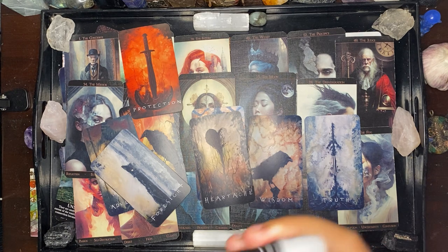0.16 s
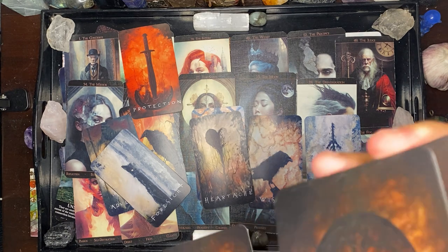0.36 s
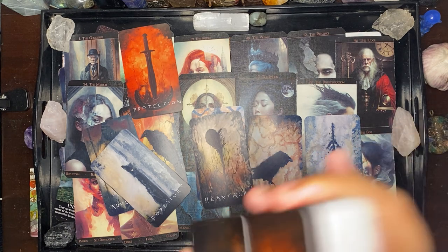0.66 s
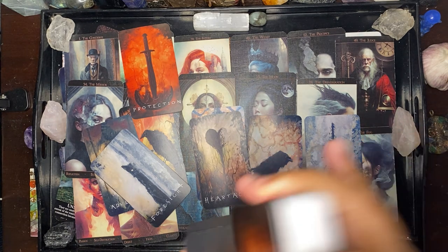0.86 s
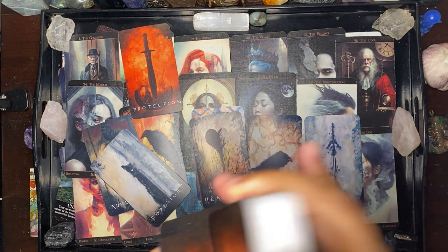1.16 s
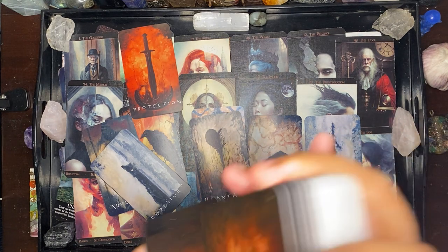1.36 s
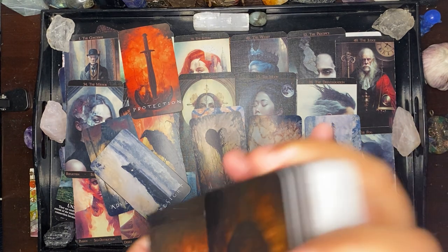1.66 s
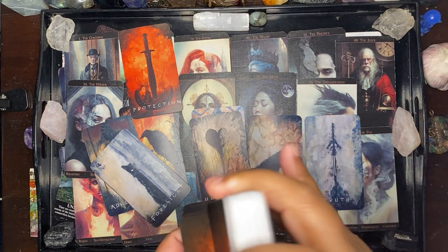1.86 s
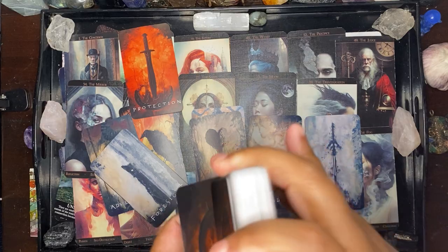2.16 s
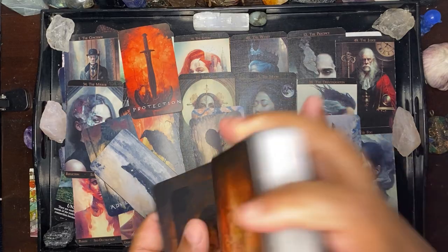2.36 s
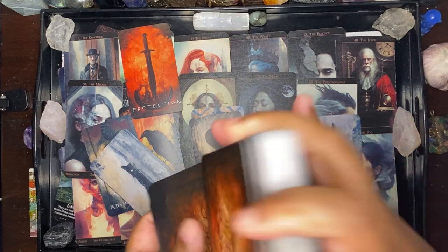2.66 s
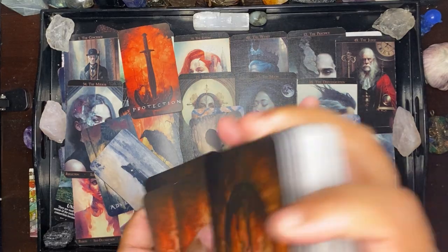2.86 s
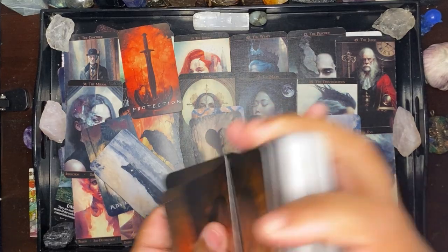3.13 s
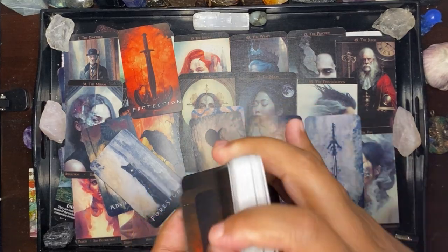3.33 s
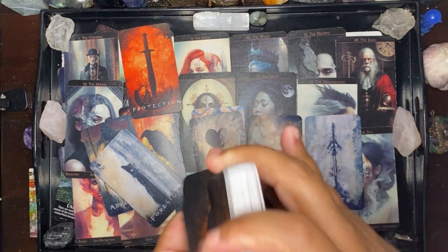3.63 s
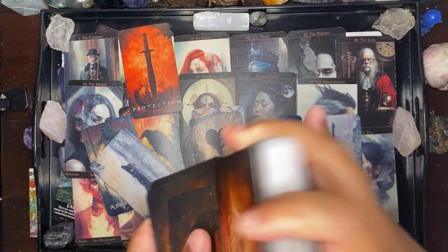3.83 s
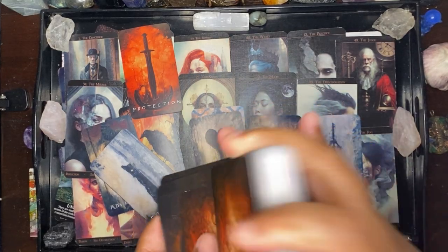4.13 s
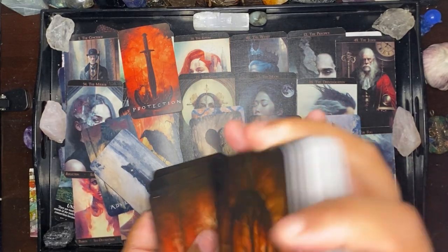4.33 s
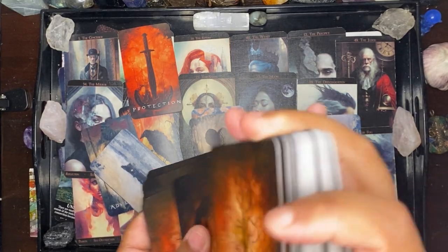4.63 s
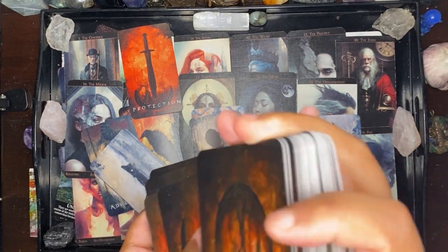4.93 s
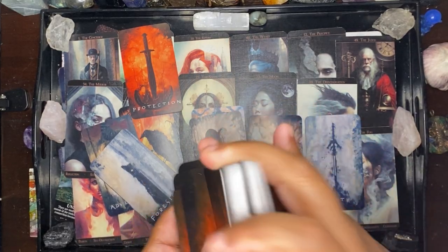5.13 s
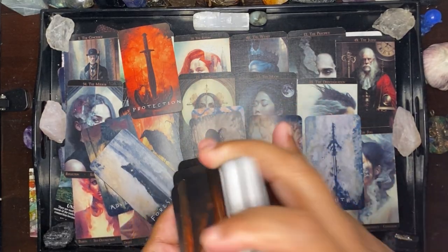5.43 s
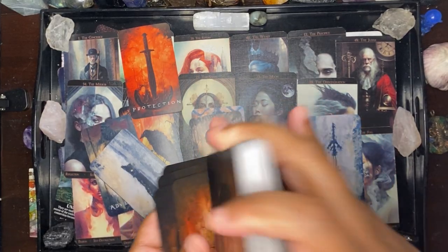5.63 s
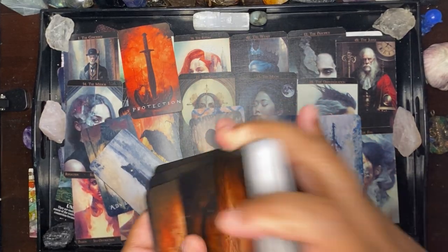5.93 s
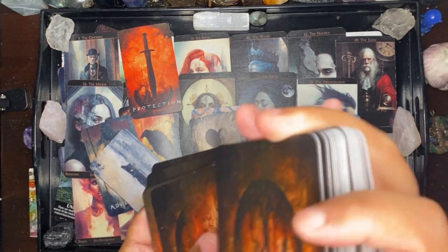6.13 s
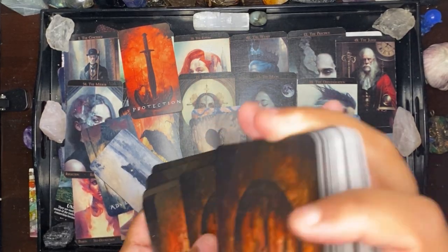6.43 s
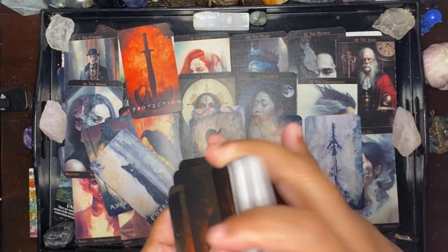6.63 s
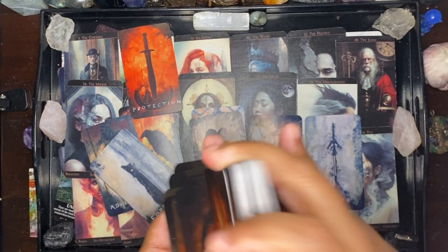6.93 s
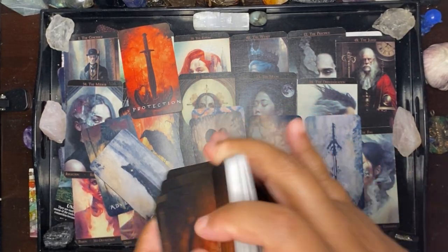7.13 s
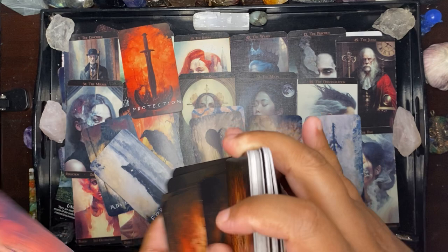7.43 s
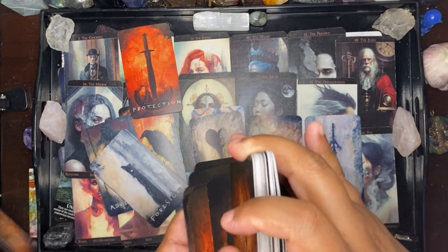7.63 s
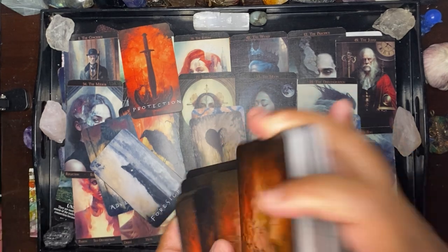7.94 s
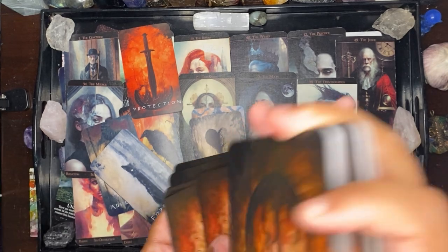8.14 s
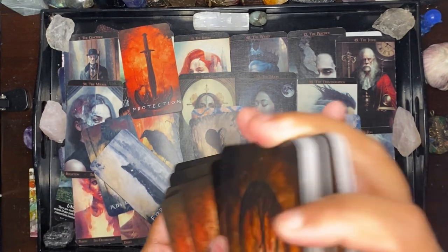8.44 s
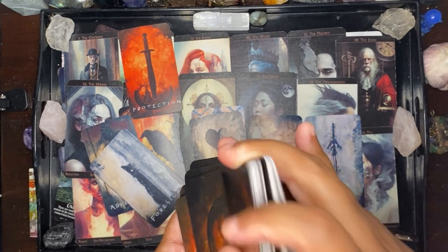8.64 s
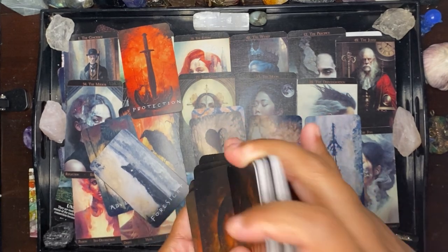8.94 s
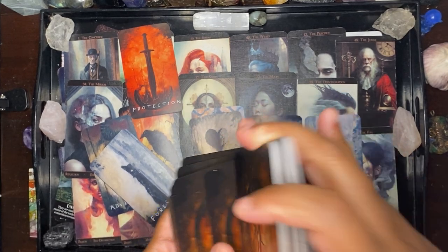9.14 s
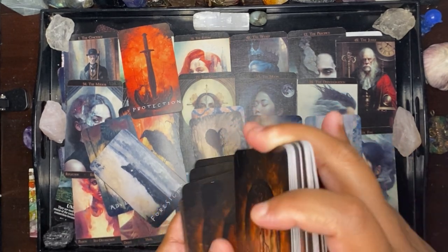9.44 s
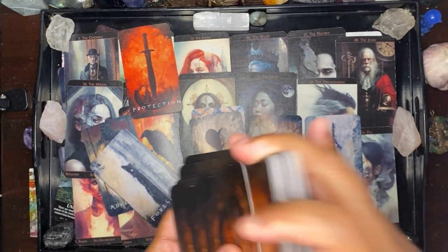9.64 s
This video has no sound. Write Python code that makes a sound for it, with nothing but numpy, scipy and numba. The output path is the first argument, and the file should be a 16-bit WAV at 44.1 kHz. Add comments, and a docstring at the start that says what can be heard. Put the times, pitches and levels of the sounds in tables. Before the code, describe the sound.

A deck of large cards is shuffled overhand close by, brisk papery hisses and soft slaps about three a second, over a faint low room hum.

```python
"""A small furnished room with a faint low hum; a phone listens from close by, above a table.
A deck of large cards is shuffled overhand, about three strokes a second. Each packet hisses off the deck
(shaped noise), touches the pile with an edge and slaps home with a soft thump in the palm (struck resonances).
Between strokes cards rustle, click and pop; the room answers with short, changing noise echoes."""
import sys
import numpy as np
from scipy import signal
from scipy.fft import rfft, irfft
from scipy.io import wavfile
from scipy.ndimage import uniform_filter1d
from numba import njit

SR = 44100
rng = np.random.default_rng(int(sys.argv[2]) if len(sys.argv) > 2 else 0)


def digitize_waveform(pressure):
    """Quantize a signal to 16-bit integers and store it at the path in sys.argv[1].

    Rows of a 2-D input are taken as channels; values are limited to [-1, 1].
    """
    field = np.atleast_2d(pressure).T
    bounded = np.clip(field, -1, 1)
    quanta = np.round(bounded * 32767).astype(np.int16)
    wavfile.write(sys.argv[1], SR, quanta)


N = 431738
TIME = np.arange(N) / SR
HIT_SIZE, LEAD_SIZE = 4096, 256  # samples in one blow, and samples kept free ahead of its push


def undb(db):
    """Decibels to gain."""
    return 10 ** (np.asarray(db) / 20)


def unit(x):
    """Scale to rms 1."""
    return x / np.sqrt(np.mean(x ** 2))


def freqs(size):
    """Frequencies of a real spectrum in Hz, kept above zero."""
    return np.maximum(np.fft.rfftfreq(size, 1 / SR), 1)


def gains(points, size):
    """Gain per frequency from (Hz, dB) points, joined on a logarithmic pitch scale."""
    hz, db = np.transpose(points)
    return undb(np.interp(np.log(freqs(size)), np.log(hz), db))


def colour(x, points):
    """Filter by (Hz, dB) points, to rms 1."""
    size = x.shape[-1]
    return unit(irfft(rfft(x) * gains(points, size), size))


def walk(rate):
    """Smooth random drift with rms near 1, drawing a new value `rate` times a second."""
    hold = max(int(SR / rate), 1)
    steps = np.repeat(rng.standard_normal(N // hold + 1), hold)
    return unit(uniform_filter1d(steps, hold)[:N])


def add(out, start_s, x):
    """Mix x into out from a start time."""
    i = max(int(start_s * SR), 0)
    out[i:i + len(x)] += x[:max(N - i, 0)]


# Lead of the left microphone port over the right: pitch_hz, phase_radians
PORT_PHASE = [(0, 0), (950, -.35), (2400, .6), (4400, .9), (5200, .3), (6400, 2.2), (7350, 3.14),
              (10900, 6.5), (13500, 9.42), (16000, 11.9)]
# Left port level minus right: pitch_hz, level_db
PORT_BALANCE = [(100, -.2), (350, -.8), (600, -2.5), (1100, -1), (2400, -1.6), (3600, 1), (4500, -1.8),
                (6000, 0)]


def ports(x):
    """Two microphone ports hear the near sound with a lag and a slight imbalance."""
    hz, radians = np.transpose(PORT_PHASE)
    half_phase = np.exp(.5j * np.interp(freqs(N), hz, radians))
    lean = np.sqrt(gains(PORT_BALANCE, N)) * half_phase
    return irfft(rfft(x) * np.array([lean, 1 / lean]), N)


# Spectrum of the room's low rumble, scaled to rms 1 on use: pitch_hz, level_db
AIR = [(20, -31), (35, -17.5), (48, 3.5), (65, 4), (90, -5), (125, 4), (160, -7), (320, -7), (500, -14.5),
       (1000, -19), (2500, -35.5), (6000, -47), (16000, -59)]
# Hum lines, level as rms about which each one wavers: pitch_hz, level_db
HUM = [(119.3, -57), (188, -68), (236, -74), (287, -74.5), (326, -69.5)]


def background(air_db=-56, port_hiss_db=-84):
    """Low rumble of the room with a wavering hum, nearly alike at both ports."""
    air = undb(air_db) * colour(rng.standard_normal(N), AIR) * undb(0.76 * walk(5.4))
    hum = np.zeros(N)
    for hz, db in HUM:
        line = unit(np.sin(2 * np.pi * hz * TIME + 0.39 * walk(8.7)))
        hum += undb(db + 1.8 * walk(8)) * line
    return ports(air + hum) + undb(port_hiss_db) * rng.standard_normal((2, N))


def friction(grain_db, patchy_db):
    """Card faces rubbing: dense tiny slips, as noise whose level wavers finely and in uneven patches."""
    return rng.standard_normal(N) * undb(grain_db * walk(1500) + patchy_db * walk(110))


def ticks(rate, spread_db, ring_s):
    """Single card edges slipping past each other: sparse crisp grains of uneven size."""
    starts = rng.random(N) < rate / SR
    sizes = starts * undb(spread_db * np.minimum(rng.exponential(1, N), 3))
    envelope = signal.lfilter([1], [1, -np.exp(-1 / (ring_s * SR))], sizes)
    return envelope * rng.standard_normal(N)


# How the cards creep before a landing: the creep mostly starts earlier in later strokes, and its rub
# rises and falls: time_s, creep_lead_s (creep starts this long before a landing), extra_rub_db
GRIP = [(.3, 0.089, 2.5), (1, 0.11, -2), (2.3, 0.11, 3.5), (3.2, 0.16, -3), (4.9, 0.14, -3),
        (6.4, 0.16, 0.5), (7.3, 0.17, 4), (8.2, .15, 0.5), (9.7, 0.19, -0.5)]


def creep(rest_db, grip_db, lift_db, attack_s=0.014, lift_s=0.05, release_s=.15):
    """Gain of the creeping cards: it starts with the grip, grows as the packet is lifted, then dies away."""
    db = np.full(N, float(rest_db))
    time_s, creep_lead_s, _ = np.transpose(GRIP)
    for landing, *_ in STROKES:
        grip = landing - np.interp(landing, time_s, creep_lead_s)
        lift = landing - lift_s
        moments = [grip - attack_s, grip, lift, lift + release_s]
        db = np.maximum(db, np.interp(TIME, moments, [rest_db, grip_db, lift_db, rest_db]))
    return undb(db)


# Spectrum of the bright hiss of card faces, scaled to rms 1 on use: pitch_hz, level_db
HISS = [(800, -26), (3000, -27), (4300, -8), (5400, -1.5), (6400, 0.5), (7600, 3.5), (9400, 3.5),
        (11200, -4), (13000, 1.5), (15500, -3)]
# Spectrum of the duller rub of the cards, scaled to rms 1 on use: pitch_hz, level_db
RUB = [(150, 3), (500, -4.5), (900, -6.5), (1300, -2.5), (2300, -0.5), (3000, -1.5), (3900, -9.5),
       (5500, -7.5), (9000, -58.5)]
# Longer rubs as the deck is shifted in the hand, swelling and fading alike: peak_s, fade_s, level_db
RUBS = [(0.063, 0.015, -46), (.2, 0.033, -59), (2.4, 0.022, -55), (6.845, 0.011, -46), (7.18, 0.018, -56),
        (7.61, 0.012, -50), (7.67, 0.022, -50), (7.785, 0.023, -44.5), (8.08, .035, -66),
        (9.21, 0.039, -55), (9.625, 0.014, -54)]


def rustle(tick_db=-7):
    """Cards creep and tick against each other around each stroke and whenever the deck is shifted."""
    time_s, _, extra_rub_db = np.transpose(GRIP)
    shifts = sum(undb(db) * np.exp(-np.abs(TIME - peak) / fade_s) for peak, fade_s, db in RUBS)
    grains = undb(tick_db) * unit(ticks(rate=70, spread_db=5, ring_s=.0012))
    rub = colour(unit(friction(grain_db=2.0, patchy_db=4.0)) + grains, RUB)
    hiss = colour(unit(friction(grain_db=3.5, patchy_db=4.5)) + grains, HISS)
    extra_rub = undb(np.interp(TIME, time_s, extra_rub_db))
    rub_gain = creep(rest_db=-69.5, grip_db=-58.5, lift_db=-54.0) * extra_rub + shifts
    hiss_gain = creep(rest_db=-69, grip_db=-58, lift_db=-47) + undb(-12) * shifts
    return rub_gain * rub + hiss_gain * hiss


@njit
def sweep(x, hz, width):
    """Band-pass with a moving centre; width is a share of the centre."""
    y, band, low = np.empty(len(x)), 0., 0.
    for i in range(len(x)):
        g = np.tan(np.pi * hz[i] / SR)
        v = (band + g * (x[i] - low)) / (1 + g * (g + width))
        band, low, y[i] = 2 * v - band, low + 2 * g * v, width * v
    return y


# One row per stroke, levels before each sound's own trims: landing_s, slide_lead_s and edge_lead_s (slide
# start and edge touch, this long before landing), hiss_db, edge_db, spread_s (time over which cards arrive),
# thump_db (palm), clap_db, hardness_db_per_octave, crack_db (faces)
STROKES = [(0.2931, 0.046, 0.021, -35, -35.5, 0.0022, -34, -35.5, -1.5, -50),
           (.6832, 0.015, 0.0043, -40, -52, 0.0041, -39, -35, -1.8, -33),
           (1.0331, 0.025, 0.0069, -33, -29.5, 0.0031, -37, -28.5, 2.5, -24.5),
           (1.376, 0.037, .012, -32, -38.5, 0.0011, -44, -40, 0, -30),
           (1.6694, .027, 0.0098, -33, -38, 0.00069, -41, -35.5, 2, -32),
           (1.983, 0.029, 0.0094, -35.5, -38.5, .0018, -40, -33, 2.2, -29.5),
           (2.2643, 0.039, 0.0056, -32, -40, .0021, -38, -33, 1.7, -32),
           (2.5925, 0.046, 0.0093, -30.5, -39, 0.00093, -32, -29, 3, -28),
           (2.8745, 0.034, .009, -31.5, -38, 0.00076, -37, -31.5, 1, -23.5),
           (3.1958, 0.051, .01, -35, -34.5, 0.00041, -30, -27.5, 2, -24),
           (3.4562, 0.038, .009, -29, -39.5, 0.0019, -34.5, -29.5, 2.5, -25),
           (3.7724, .045, 0.0092, -29, -41.5, 0.0019, -37.5, -33, 2, -31),
           (4.0539, 0.037, .01, -28.5, -37, 0.0027, -36.5, -30.5, 1.2, -35),
           (4.3458, 0.039, .008, -33, -35.5, 0.00056, -31, -30, 2.3, -34.5),
           (4.6514, 0.057, 0.0081, -28, -42.5, 0.0017, -30.5, -32, -5, -63),
           (4.925, 0.048, 0.0093, -31, -38.5, 0.0012, -30.5, -34, 6.5, -24.5),
           (5.243, .061, 0.0097, -29, -37.5, 0.0013, -30.5, -29, -3.5, -56),
           (5.5204, 0.033, 0.0084, -29.5, -39, 0.0022, -30.5, -29.5, 1, -32.5),
           (5.8376, .042, 0.008, -29.5, -36.5, .0014, -28, -30.5, -2.5, -41),
           (6.13, 0.045, 0.0054, -29.5, -39.5, 0.00068, -27, -30, 1.5, -27),
           (6.429, .037, 0.0076, -28.5, -37.5, 0.00052, -26, -31.5, -1.5, -28),
           (6.7372, 0.051, 0.0091, -28.5, -35, 0.0019, -28, -34.5, -3.5, -52),
           (7.0166, 0.042, 0.0071, -28, -42.5, 0.0012, -26.5, -28.5, 1.7, -24),
           (7.313, 0.044, 0.0079, -43.5, -55, 0.0016, -31.5, -30, -1.8, -38.5),
           (7.8366, 0.039, .0105, -27.5, -36.5, 0.00084, -30.5, -35.5, -5, -36.5),
           (8.1416, 0.031, .0067, -31.5, -36.5, .0015, -27.5, -29, 1, -29),
           (8.4702, 0.057, .018, -28.5, -39.5, 0.0014, -35, -35, -3.5, -43),
           (8.764, 0.075, 0.025, -29.5, -53, 0.0017, -40, -40.5, -4, -48),
           (9.0458, 0.045, .008, -33, -39, 0.0019, -28.5, -29, -3.5, -36),
           (9.6943, 0.024, .003, -38.5, -45, .00065, -30.5, -34, -2.1, -29)]


def slides(fade_db=24, rise_s=.009, stop_s=0.0027, open_hz=5200, closed_hz=2400, free_s=0.024,
           slowing_db_per_s=380, scrape_db=-35, scrape_follow=0.28, usual_edge_db=-39):
    """A packet hisses off the deck; as it nears the pile its edge scrapes with a falling resonance."""
    out = np.zeros(N)
    hiss = colour(friction(grain_db=1.5, patchy_db=2.0), HISS)
    rub = colour(friction(grain_db=0.5, patchy_db=4.0), RUB)
    for landing, slide_s, lead_s, hiss_db, edge_db, *_ in STROKES:
        start, end = landing - slide_s, landing - lead_s
        i, j = int((start - rise_s) * SR), int((end + stop_s) * SR)
        t, length = TIME[i:j], end - start
        # the hiss swells early and fades as the packet slows; the scrape grows until the edge touches
        late_db = hiss_db - slowing_db_per_s * (length - free_s)
        moments = [t[0], start + 0.1 * length, start + 0.49 * length, start + 0.86 * length, end - .001, t[-1]]
        hiss_steps = [hiss_db - fade_db, hiss_db, hiss_db, late_db, late_db + 2, late_db - fade_db]
        hiss_curve = np.interp(t, moments, hiss_steps)
        scrape_curve = np.interp(t, moments, [-16.0, -22, -11, -1.5, 5.0, -3.5])
        # a harder edge knock follows a louder scrape
        scrape_curve += scrape_db + scrape_follow * (edge_db - usual_edge_db)
        falling_hz = np.geomspace(open_hz, closed_hz, j - i)
        edge = unit(sweep(rng.standard_normal(j - i), falling_hz, 0.37))
        scrape = undb(-2.0) * edge + undb(-4.5) * unit(rub[i:j])
        out[i:j] += undb(hiss_curve) * hiss[i:j] + undb(scrape_curve) * scrape
    return out


# Centres of the overlapping bands in which a blow's levels are set: pitch_hz
BANDS_HZ = [70, 300, 900, 2600, 9000]


def tilt(hardness_db, pivot_hz):
    """Level in each band of a contact: the harder it is, the more treble and the less bass."""
    return hardness_db * np.log2(np.array(BANDS_HZ) / pivot_hz)


# Resonances of the deck held in cupped hands, before each grip detunes them and the bands are levelled:
# pitch_hz, width_hz, level_db
DECK = [(72, 46, 11.5), (250, 150, 1.5), (399, 46, 4.5), (724, 55, 4.5), (940, 290, -0.5), (2430, 780, 4.5),
        (6360, 4300, -4)]


def contact(band_db, spread_s, scatter_db, scatter_hz, lag_cycles, grip=0.053, rattle_db=-16,
            ahead_s=0.00089, top_hz=7000):
    """One blow on the deck: a push among single cards clapping together, ringing the deck's resonances."""
    t, f = (np.arange(HIT_SIZE) - LEAD_SIZE) / SR, freqs(HIT_SIZE)
    # a few cards arrive just ahead of the packet, and stragglers rattle after it
    arrivals = np.exp(-np.abs(t) / np.where(t < 0, ahead_s, spread_s))
    uneven = rng.exponential(1, HIT_SIZE // 32).repeat(32)
    stragglers = undb(rattle_db) * (t > 0) * np.exp(-np.abs(t) / .007) * uneven
    claps = np.roll(rng.standard_normal(HIT_SIZE) * (arrivals + stragglers), -LEAD_SIZE)
    # at low frequencies the packet moves as one, so only the push is left
    scatter = undb(scatter_db) * f / (f + scatter_hz)
    scatter = scatter / np.sqrt(1 + (f / top_hz) ** 2)  # soft claps lack the push's top
    force = 1 + scatter * rfft(claps / np.linalg.norm(claps))
    hz, width, db = np.transpose(DECK)[:, :, None]
    hz = hz * np.exp(grip * rng.standard_normal(hz.shape))  # every grip tunes the deck a little differently
    body = 1 + np.sum(undb(db) / (1 + 1j * (f / hz - hz / f) * hz / width), axis=0)
    # the cards bend and squeeze out air: low tones come late, so the blow is a fast falling chirp
    chirp = np.exp(-2j * np.pi * lag_cycles * np.log(f)) / np.sqrt(1 + (48 / f) ** 8)
    delay = np.exp(-2j * np.pi * f * LEAD_SIZE / SR)
    spectrum = force * body * chirp * delay
    out = 0
    # a shorter list of levels leaves out the lowest bands
    for share, level_db in zip(np.eye(len(BANDS_HZ))[-len(band_db):], band_db):
        part = irfft(spectrum * np.interp(np.log(f), np.log(BANDS_HZ), share))
        out = out + undb(level_db) * part / np.linalg.norm(part)
    return out * np.sqrt(SR / 100)  # band levels are rms over 10 ms


def edges():
    """The packet's edge knocks on the pile just ahead of each slap, with a small puff of air."""
    out = np.zeros(N)
    trim_db = np.array([-6, -1.0, -3.5, -1.5, -18.5])  # per band
    for landing, _, lead_s, _, edge_db, *_ in STROKES:
        knock = contact(edge_db + trim_db, 0.0016, scatter_db=9.0, scatter_hz=1100, lag_cycles=1.2)
        add(out, landing - lead_s - LEAD_SIZE / SR, knock)
    return out


def slaps(settle_db=-13, settle_s=.009, lag_spread=0.17, hollow=0.22, thin=0.08):
    """Packets land flat on the pile and thump in the palm; a loose card settles just after each."""
    out = np.zeros(N)
    trim_db = np.array([0.1, -1.53, -1.5, -1.76, -0.014])  # per band
    chances = rng.uniform(-1, 1, (len(STROKES), 3))
    for stroke, (stiffness, late, hard) in zip(STROKES, chances):
        landing, *_, spread_s, thump_db, clap_db, hardness_db, crack_db = stroke
        low, middle, high = clap_db + tilt(hardness_db, pivot_hz=883)[1:4]
        # a packet cushioned by air cracks less and sounds hollow and thin
        cushion_db = clap_db - crack_db
        low, middle = low - thin * cushion_db, middle + hollow * cushion_db
        start = landing - LEAD_SIZE / SR
        band_db = np.array([thump_db, low, middle, high, crack_db]) + trim_db
        slap = contact(band_db, spread_s, scatter_db=7.5, scatter_hz=607,
                       lag_cycles=.95 * (1 + lag_spread * stiffness),
                       rattle_db=-19, ahead_s=0.00076, top_hz=10000)
        add(out, start, slap)
        loose_card = contact(band_db[1:] + settle_db + 3 * hard, 0.0026, scatter_db=6.5, scatter_hz=300,
                             lag_cycles=0.5054, top_hz=4000)
        add(out, start + settle_s * (1 + .5 * late), loose_card)
    return out


# Card edges clicking as the deck is gripped again, level before the band trims:
# start_s, level_db, hardness_db_per_octave
CLICKS = [(.568, -54, -1.8), (.916, -55.5, -1), (.951, -55.5, -1), (1.298, -56.5, 0.5), (1.568, -64.5, -1),
          (1.592, -51.5, 0), (1.859, -57, -1.5), (2.729, -53, 1.5), (2.78, -48.5, -0.6), (3.079, -63.5, 4),
          (3.696, -51.5, -2), (3.894, -56.5, -0.5), (4.826, -58.5, 2), (5.375, -58, 1), (5.976, -48, -0.5),
          (6.279, -47, -0.5), (6.866, -58.5, -2), (7.146, -50.5, 2), (7.59, -41, -2), (7.64, -37, -2.5),
          (7.648, -44, -4.5), (7.753, -38, -0.5), (7.853, -36, 1), (7.999, -55, 3.5), (8.023, -56, -0.5),
          (8.232, -45.5, -2.5), (8.272, -56, -5), (8.58, -40, 0.2), (8.873, -53, 2.3), (9.167, -41, 1),
          (9.259, -61.5, 4.5), (9.546, -56, 2.3)]


def clicks():
    """Edges click lightly as the fingers take hold of the next packet: weak blows on the deck."""
    out = np.zeros(N)
    trim_db = np.array([-12, -5.5, -1.6, 2.5, 4.5])  # per band
    for start, db, hardness_db in CLICKS:
        band_db = db + trim_db + tilt(hardness_db, pivot_hz=1600)
        click = contact(band_db, 0.0017, scatter_db=10.0, scatter_hz=1100, lag_cycles=1.2)
        add(out, start - LEAD_SIZE / SR, click)
    return out


# Hollow pops of air pockets between flexing cards, level as rms over 10 ms:
# start_s, pitch_hz, ring_s, give_s (time the card takes to give way), level_db
POPS = [(0.636, 2400, 0.00067, .002, -40), (1.033, 2420, 0.0005, 0.0027, -25.5),
        (7.473, 1150, 0.00017, 0.011, -36), (7.48, 500, 0.0047, 0.0038, -36.5),
        (7.6479, 2900, 0.00039, 0.0014, -27), (7.649, 1200, 0.00064, 0.0027, -33),
        (7.724, 1250, .0008, .004, -39.5), (7.753, 2600, 0.0009, 0.0017, -30.5),
        (8.579, 1670, 0.00063, 0.0041, -35.5), (9.166, 2070, 0.00058, 0.001, -36)]


def pops():
    """A bowed card gives way in a burst of noise and the air pocket behind it rings briefly."""
    out, t = np.zeros(N), TIME[:HIT_SIZE]
    for start, hz, ring_s, give_s, db in POPS:
        snap = rng.standard_normal(HIT_SIZE) * np.exp(-t / give_s)
        pocket = np.sin(2 * np.pi * hz * t) * t * np.exp(-t / ring_s)
        ring = signal.fftconvolve(snap, pocket)
        add(out, start, undb(db) * ring / np.linalg.norm(ring) * np.sqrt(SR / 100))
    return out


def sway(pair, lag_samples=0.16):
    """The hands swing a little from side to side, which shifts the lag between the ports."""
    shift = lag_samples * walk(3.004) * np.gradient(pair, axis=1)
    return pair + shift * np.array([[1], [-1]])


# Spectrum of the room's echoes, scaled to rms 1 on use: pitch_hz, level_db
ROOM_COLOUR = [(50, -9), (150, -4), (350, 5.5), (1000, 2.5), (2500, 1), (5000, 2), (9000, -5), (16000, -6)]


def room(x, t60_s, wet_db, early_s, early_db, apart_db, count=24):
    """Quick echoes from table and body, then a furnished room's tail; the echoes change as the hands move."""
    t, wet = TIME[:SR // 2], np.zeros((2, N))
    tail, early = undb(wet_db - 60 * t / t60_s), undb(early_db) * np.exp(-t / early_s)
    decay = (tail + early) * (t > .002)
    step = N // count + 1
    for i in range(0, N, step):
        echoes = colour(rng.standard_normal((2, len(t))), ROOM_COLOUR) * decay
        for channel, echo in zip(wet, echoes):
            add(channel, i / SR, signal.fftconvolve(x[i:i + step], echo))
    mid, side = wet
    side = irfft(rfft(side) * freqs(N) / (freqs(N) + 400), N)  # long waves reach both ports alike
    return ports(mid) + undb(apart_db) * side * np.array([[1], [-1]])


def scene():
    """The cards near the microphone, their echoes and the background."""
    cards = rustle() + slides() + edges() + slaps() + clicks() + pops()
    echoes = room(cards, t60_s=0.29, wet_db=-48.5, early_s=0.007, early_db=-39.5, apart_db=-1.5)
    return background() + sway(ports(cards)) + echoes


def record(dry, top_hz=16050):
    """The phone cuts the top of the treble with a steep low-pass."""
    low_pass = signal.ellip(8, .2, 70, top_hz, fs=SR, output="sos")
    return signal.sosfilt(low_pass, dry)


dry = scene()
out = record(dry)
digitize_waveform(out)
```